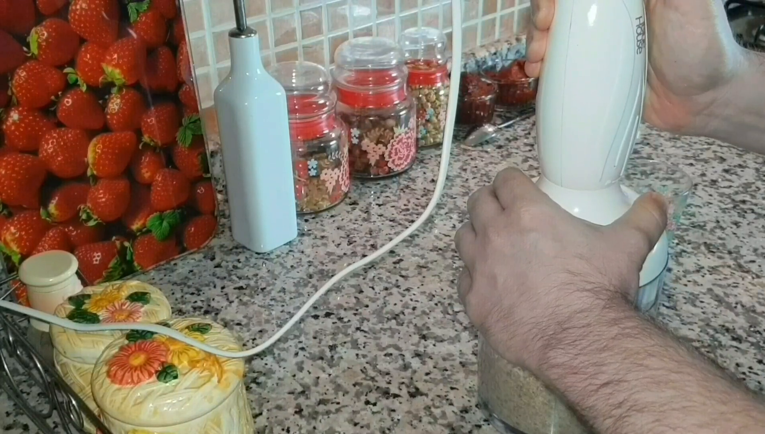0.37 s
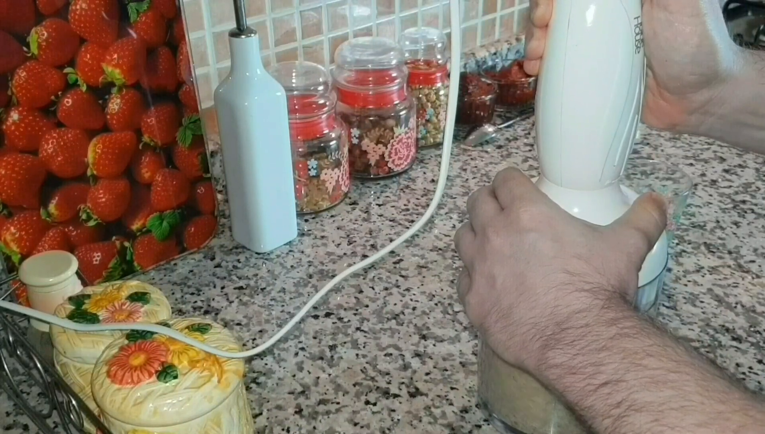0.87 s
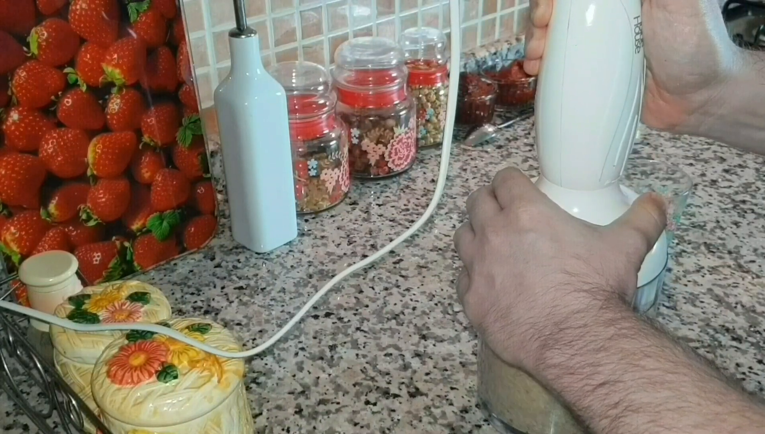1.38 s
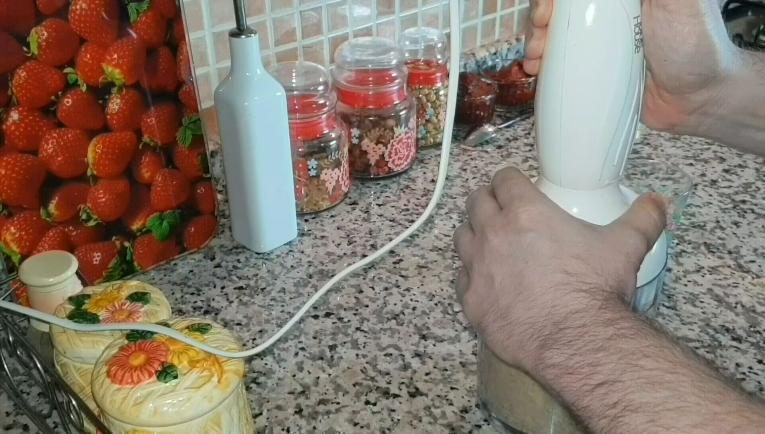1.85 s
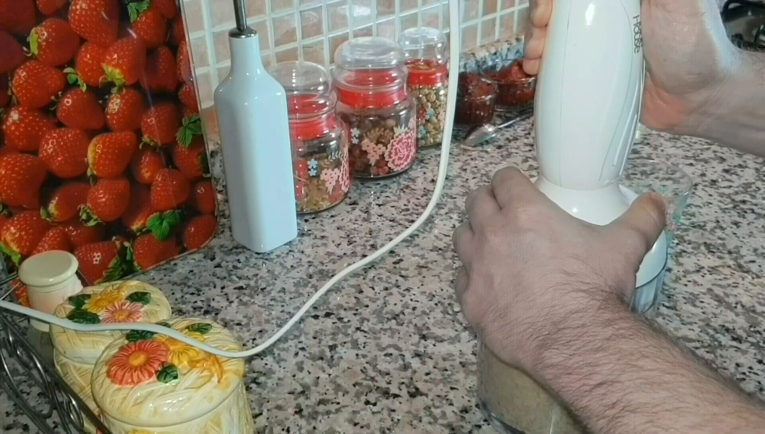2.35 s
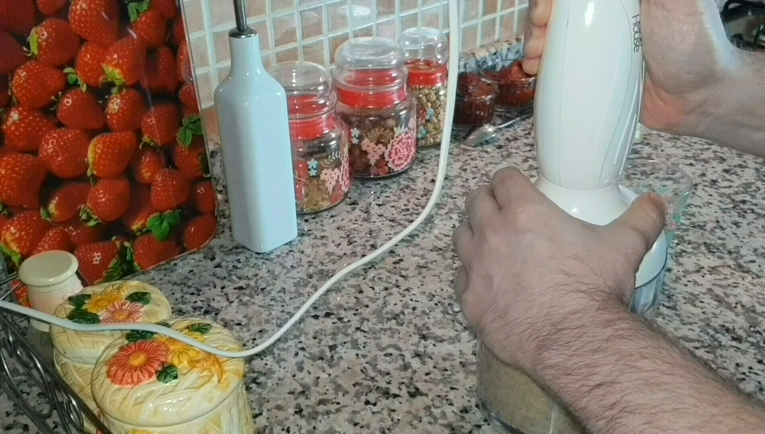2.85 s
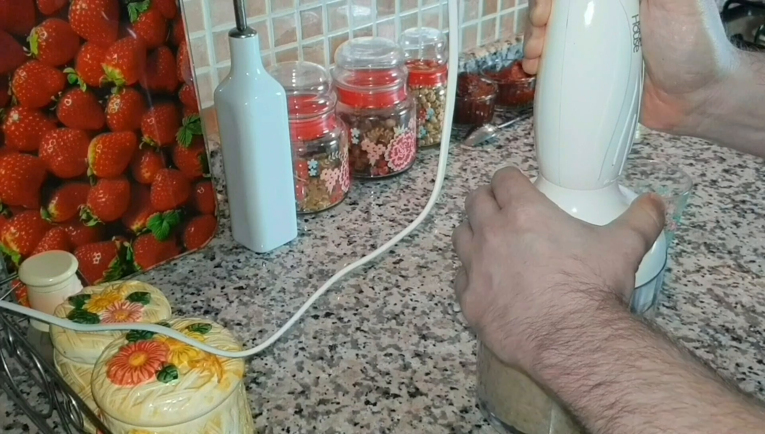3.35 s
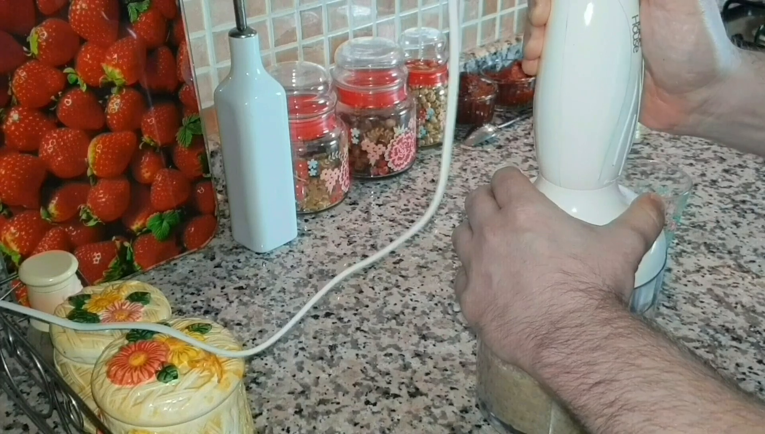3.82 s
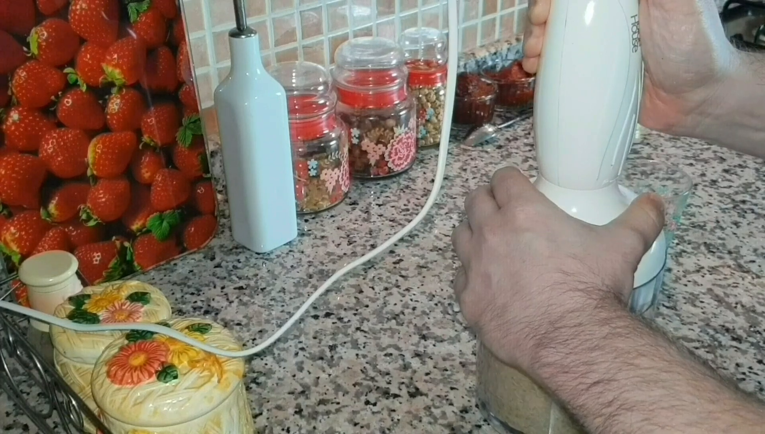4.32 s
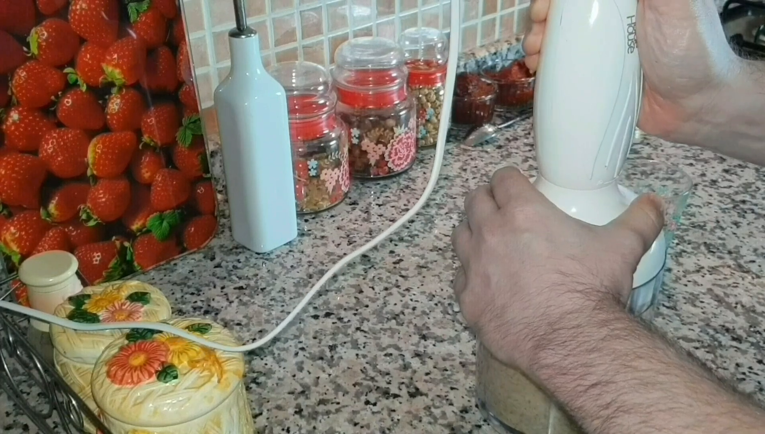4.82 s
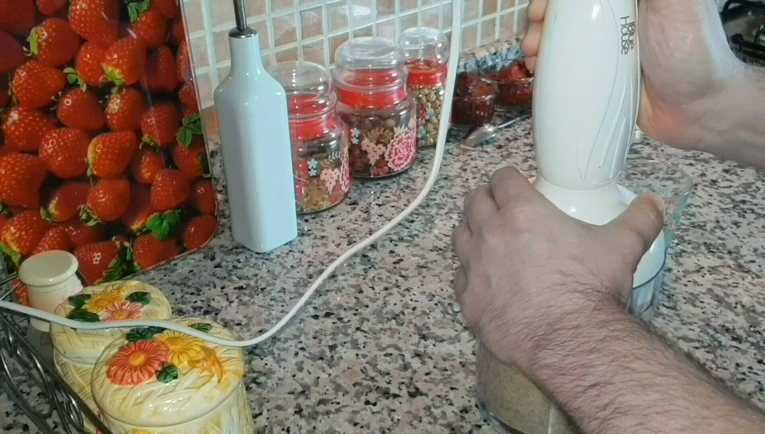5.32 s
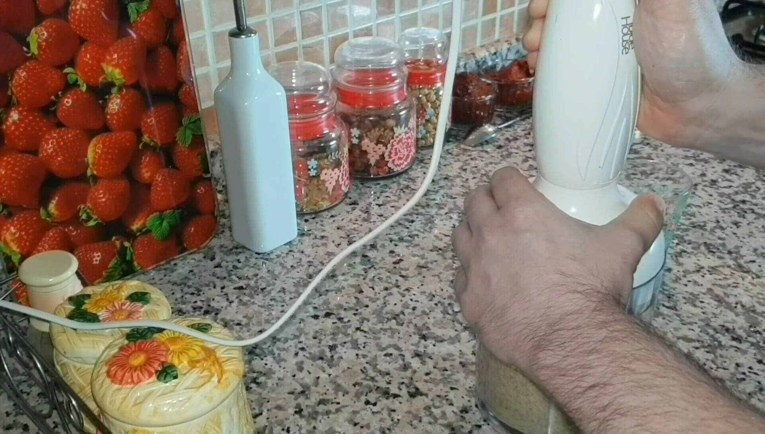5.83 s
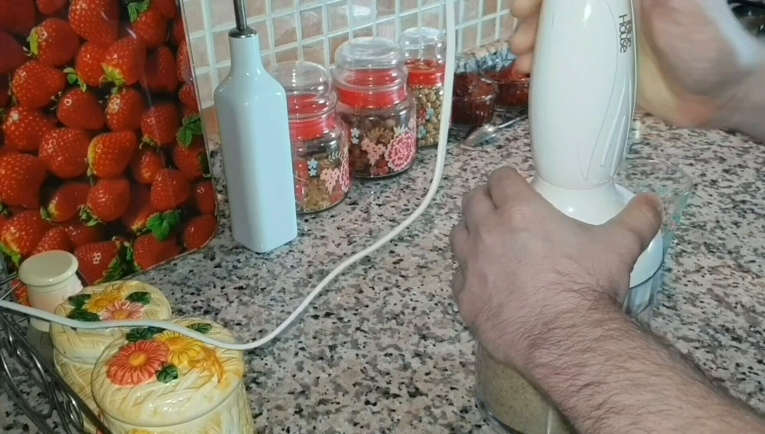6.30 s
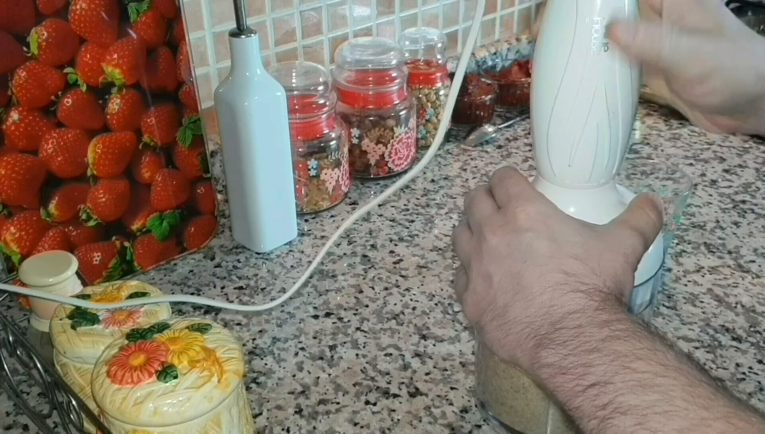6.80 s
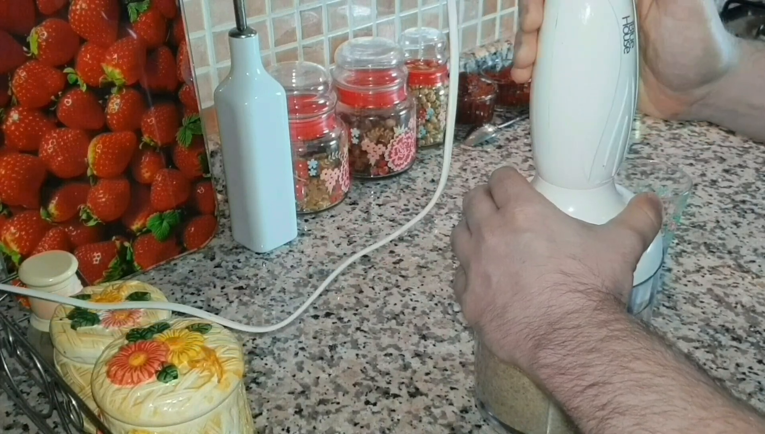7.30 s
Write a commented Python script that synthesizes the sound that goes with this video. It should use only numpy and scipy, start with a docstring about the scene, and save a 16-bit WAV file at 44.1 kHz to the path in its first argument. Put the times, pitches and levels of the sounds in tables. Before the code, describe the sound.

Harsh electric chopper whine with hissing, knocking nuts, stopping and restarting abruptly in a small kitchen, ending with quiet plastic taps and palm rubbing.

```python
"""A hand blender, running from the outset, drives a chopper bowl of nuts on a stone counter in four bursts.
In each the motor's shaft orders whine as sines on one shaft phase, while filtered noise and random impacts
make the nuts hiss, rumble and knock the bowl. Single slams ring bowl modes; decaying sines jolt the body.
Between bursts faint murk and tones fade in the room; lastly a hand taps the handle and its palm rubs it.
A diffuse kitchen field and a steady noise floor lie under everything."""
import sys
import numpy as np
from scipy import signal
from scipy.fft import rfft, irfft, next_fast_len
from scipy.io import wavfile
from scipy.ndimage import map_coordinates

SR = 44100
rng = np.random.default_rng(int(sys.argv[2]) if len(sys.argv) > 2 else 0)


def to_linear_factor(level_db):
    """Convert decibel levels (scalar or array-like) to linear amplitude factors."""
    exponent = np.asarray(level_db, float) / 20
    return 10 ** exponent


def digitize_waveform(pressure):
    """Quantize a signal to 16-bit integers and store it at the path in sys.argv[1].

    Rows of a 2-D input are taken as channels; values are limited to [-1, 1].
    """
    field = np.atleast_2d(pressure).T
    bounded = np.clip(field, -1, 1)
    quanta = np.round(bounded * 32767).astype(np.int16)
    wavfile.write(sys.argv[1], SR, quanta)


N = 338247
T = np.arange(N) / SR  # time in s
GEAR = 4.06  # shaft turns per blade turn

# motor power on and off: on_s, off_s
SWITCH = [(-.5, 0.18), (.648, 3.585), (3.79, 5.2414), (5.597, 6.203)]
# resonances of the bowl: centre_hz, width_hz, gain_db
BOWL = [(2377, 180, 1.5), (2525, 110, 3), (2770, 140, -8.5), (3210, 63, -2.5), (13500, 2100, -24)]


def unit(x):
    """Normalization to unit root-mean-square."""
    return x / np.sqrt(np.mean(x ** 2) + 1e-20)


def along(points, hz):
    """Spectral curve: (hz, value) points interpolated over log frequency."""
    f, v = np.transpose(points)
    return np.interp(np.log(hz + 1), np.log(f + 1), v)


def curves(table):
    """Slow control signals: one value per sample for each column after the time."""
    s, *cols = np.transpose(table)
    return [np.interp(T, s, c) for c in cols]


def wobble(rate):
    """Band-limited modulation: a smooth random curve with `rate` knots a second, at most 390."""
    knots = rng.standard_normal(int(N / SR * 400))
    return map_coordinates(knots, [T * min(rate, 390)])


def filtered(x, response):
    """Linear filtering: the spectrum of x times a complex response of frequency."""
    m = next_fast_len(N + SR // 2)
    return irfft(rfft(x, m) * response(np.fft.rfftfreq(m, 1 / SR)), m)[..., :N]


def modes(table):
    """Modal superposition: second-order resonances of alternating sign, as a response of frequency."""
    def response(f):
        return sum((-1) ** k * to_linear_factor(db) * 1j * f * width / (centre ** 2 - f * f + 1j * f * width)
                   for k, (centre, width, db) in enumerate(table))
    return response


def squared_modes(table):
    """Cascade: the response of the resonances applied twice, which steepens their skirts."""
    return lambda f: modes(table)(f) ** 2


def grit(rate, spread_db):
    """Poisson-like impacts, `rate` a second; levels in dB are exponentially spread and capped."""
    chance, size, sign = rng.random(N), rng.exponential(size=N), rng.standard_normal(N)
    return unit((chance < rate / SR) * to_linear_factor(spread_db * np.minimum(size, 2)) * sign)


def window(start, end, fade):
    """Amplitude gating with linear ramps inside both ends."""
    return np.clip((T - start) / fade, 0, 1) * np.clip((end - T) / fade, 0, 1)


def quiet():
    """Partial coherence: a steady floor and a murky band, shared in part by both sides, and faint tones."""
    # spectrum of the steady background floor, shape only: hz, density_db
    floor_spectrum = [(26, -24), (50, 3), (149, -5), (448, -23), (519, -12), (932, -8), (1520, -14),
                      (3240, -20), (7630, -23), (15500, -21)]
    # murk around 1 kHz, mostly between and after bursts: start_s, end_s, level_db, fall_db_per_s
    murk_spells = [(0.298, 0.662, -63, 39), (5.4, 5.619, -59.5, 49), (6.4, 7.12, -72.5, 3)]
    # faint wavering tones: start_s, end_s, pitch_hz, peak_db
    faint_tones = [(0.356, 0.552, 742, -67.5), (.4, .64, 982, -69.5), (0.39, .64, 1258, -73.5),
                   (5.42, 5.52, 1240, -58), (5.45, 5.6, 1040, -64), (6.68, 6.83, 781, -67.5),
                   (7.487, 7.6, 631, -76)]
    floor_db = -71

    def coherence(f):
        """Bass is shared by both sides, treble is not."""
        blend = np.arctan(f / 600)
        return np.array([np.cos(blend), np.sin(blend)])[[0, 1, 1]]

    floor = filtered(rng.standard_normal((3, N)), lambda f: to_linear_factor(along(floor_spectrum, f)) * coherence(f))
    bed = to_linear_factor(floor_db) * unit(floor[0] + floor[1:])

    band = squared_modes([(800, 320, 0), (1161, 500, -2)])
    murk = unit(filtered(rng.standard_normal((3, N)), band))
    fading = sum(to_linear_factor(db - fall_db * (T - a)) * window(a, b, .03) for a, b, db, fall_db in murk_spells)
    bed = bed + fading * to_linear_factor(2.5 * wobble(28)) * (.83 * murk[0] + .6 * murk[1:])

    tones = np.zeros(N)
    for start, end, hz, db in faint_tones:
        level = to_linear_factor(db + 3 * wobble(30)) * window(start, end, .01)
        tones += level * np.sin(2 * np.pi * hz * np.cumsum(1 + .0061 * wobble(8.9)) / SR)
    return (bed + tones) * to_linear_factor([[-.9], [.9]])  # left a little softer than right


def kitchen(x):
    """Diffuse-field reverberation: power decays exponentially per frequency, incoherent between sides."""
    # reverberation time: hz, t60_s
    decay_times = [(350, .33), (650, 0.46), (2500, 0.16), (6000, 0.092), (14000, 0.074)]
    # gain of the room against its input: hz, gain_db
    wet = [(60, -27), (150, -17), (300, -2.5), (700, -5), (1500, -4.5), (4000, -3.5), (12000, 2.5)]
    hz, t, z = signal.stft(x, SR, nperseg=1024, noverlap=768)
    decay = to_linear_factor(-120 * (t[:96] - t[0]) / along(decay_times, hz)[:, None])  # decay of power
    decay[:, :2] = 0  # first walls arrive late
    decay /= decay.sum(1, keepdims=True)
    power = signal.fftconvolve(np.abs(z) ** 2, decay, axes=1)[:, :len(t)]
    fresh = signal.stft(rng.standard_normal((2, N)), SR, nperseg=1024, noverlap=768)[2]
    fresh = fresh / np.sqrt(np.mean(np.abs(fresh) ** 2))
    field = fresh * np.sqrt(np.abs(power)) * to_linear_factor(along(wet, hz))[:, None]
    return signal.istft(field, SR, nperseg=1024, noverlap=768)[1][:, :N]


def hand():
    """Impact and friction excitation: taps ring the handle and tick; the palm rubs and squeaks."""
    # taps, levels ahead of the resonances: start_s, knock_db, tick_db
    taps = [(6.522, -43.5, -60.5), (6.589, -42, -55.5), (6.669, -45, -41), (6.901, -43.5, -54),
            (6.974, -64.5, -50), (7.008, -56, -50)]
    # slides of the palm: start_s, end_s, level_db, squeak_db against the rub
    rubs = [(6.397, 6.659, -71.5, -20), (6.672, 6.791, -76.5, 6), (6.894, 7.12, -73, -22)]
    # resonances of the handle: centre_hz, width_hz, gain_db
    handle = [(530, 160, -3), (748, 270, 0.5), (935, 100, 5), (1180, 330, 1.5)]
    # resonance of the handle's plastic shell: centre_hz, width_hz, gain_db
    shell = [(4700, 2400, 0)]
    # resonances of the rub: centre_hz, width_hz, gain_db
    palm = [(4000, 2500, -1.5), (6820, 2000, -5.5)]
    # resonances of the squeak: centre_hz, width_hz, gain_db
    squeak_modes = [(1970, 145, 1), (2200, 120, 3), (4930, 400, -1)]
    scrape_t60_s, tick_t60_s = .085, .025
    blow_db = 16  # first blow over the scrape that follows

    knock, tick = np.zeros((2, N))
    t = np.arange(SR // 8) / SR
    for s, knock_db, tick_db in taps:
        at = round(s * SR)
        blow_and_scrape = rng.standard_normal(len(t)) + to_linear_factor(blow_db) * (t == 0)
        knock[at:at + len(t)] += to_linear_factor(knock_db - 60 * t / scrape_t60_s) * blow_and_scrape
        tick[at:at + len(t)] += to_linear_factor(tick_db - 60 * t / tick_t60_s) * rng.standard_normal(len(t))

    skin = unit(filtered(grit(1500, spread_db=4.5) * to_linear_factor(4 * wobble(40)), modes(palm)))
    squeak = unit(filtered(rng.standard_normal(N), squared_modes(squeak_modes)))
    sliding = np.zeros(N)
    for start, end, db, squeak_db in rubs:
        level = to_linear_factor(db - 27 * (T - start)) * window(start, end, .0078)
        sliding += level * (skin + to_linear_factor(squeak_db) * squeak)
    return filtered(knock, squared_modes(handle)) + filtered(tick, squared_modes(shell)) + sliding


def jolts():
    """Damped oscillation: the body shudders on the counter at starts, stops and when gripped."""
    # shudders, level ahead of the onset ramp and a factor of 3: start_s, pitch_hz, level_db, t60_s
    shudders = [(0.219, 62.1, -56, 0.34), (.67, 309, -36.5, 0.26), (3.6, 179.3, -50, 0.61),
                (3.838, 299.5, -31.5, 0.14), (6.17, 156, -47, 0.4), (6.247, 120, -44, 0.25),
                (6.335, 75, -58.5, 0.43), (6.904, 91.2, -62, 0.34)]
    out, t = np.zeros(N), np.arange(SR // 4) / SR
    for s, hz, db, t60 in shudders:
        cycles = hz * np.cumsum(1 + .1 * wobble(70)[:len(t)]) / SR
        envelope = to_linear_factor(db - 60 * t / t60) * (1 - np.exp(-t / .0057))
        out[round(s * SR):][:len(t)] += envelope * 3 * np.sin(2 * np.pi * cycles)
    return out


def slams():
    """Impulse response: big pieces slam into the wall and ring the bowl's two strongest resonances."""
    # blows on the bowl wall: start_s, peak_db
    wall_blows = [(.175, -12), (.215, -15), (.674, -8), (.703, -8), (.722, -8), (.912, -9), (1.259, -9),
                  (1.962, -8), (1.984, -7), (5.253, -14), (5.635, -13)]
    ring = filtered(T == 0, squared_modes(BOWL[:2]))[:SR // 10]
    s, db = np.transpose(wall_blows)
    blows = np.bincount(np.round(s * SR).astype(int), to_linear_factor(db), N)
    return signal.fftconvolve(blows, ring / np.abs(ring).max())[:N]


def swell():
    """Amplitude envelope of the stirring: builds in the first turns, dies once the blade has slowed."""
    up, down = [], []
    for on, off in SWITCH:
        since_on = T - on
        rise = np.clip(since_on / .009, 0, 1) * to_linear_factor(-19 * np.clip(1 - since_on / .034, 0, 1))
        up.append(np.where(since_on > 0, rise, 0))
        down.append(to_linear_factor(-230 * np.clip(T - off - .05, 0, None)))
    return np.max(np.multiply(up, down), axis=0)


def spool():
    """Exponential relaxation of rotation: share of full speed in a quick run-up and a braked coast-down."""
    up = [np.where(T > on, 1 - .55 * np.exp(-np.abs(T - on) / .03), 0) for on, off in SWITCH]
    down = [np.exp(-np.clip(T - off, 0, None) / .07) for on, off in SWITCH]
    return np.max(np.multiply(up, down), axis=0)


def ringing_spells():
    """Narrow-band resonance of noise: a low growl and a bright band, each ringing for a while."""
    # bands: centre_hz, width_hz, start_s, end_s, level_db against the load's level
    spells = [(452, 200, 2.42, 3.17, -14), (4920, 120, 1.85, 2.8, -12)]
    out = np.zeros(N)
    for hz, width, start, end, db in spells:
        band = unit(filtered(rng.standard_normal(N), squared_modes([(hz, width, 0)])))
        out += to_linear_factor(db) * window(start, end, .05) * band
    return out


def nuts(angle):
    """Granular excitation: fine pieces hiss in time with shaft, blade and mains; coarse ones rumble and knock."""
    # load in the bowl: start_s, level_db, coarseness (about 0-1)
    load = [(0, -23, 0.97), (.1, -25.5, 1.05), (.25, -34.5, .95), (.66, -23.5, 0.92), (.8, -23, 0.9),
            (2.4, -23, 0.89), (2.47, -24, 0.8), (3.12, -25.5, 0.8), (3.25, -25, 0.7), (3.55, -25, 0.7),
            (3.8, -20, 0.58), (3.96, -23, .5), (4, -24.5, 0.5), (4.8, -24, 0.59), (5.2, -24.5, 0.05),
            (5.7, -22, 0.05), (5.95, -25, 0.5), (6.15, -23.5, 0.29)]
    # spectrum of the fine spray, shape only: hz, density_db
    hiss_spectrum = [(290, -58), (500, -32), (1030, -12.5), (1210, -11.5), (1440, -9), (2090, -16),
                     (2830, -5), (3730, -7), (4180, -8.5), (4760, -11.5), (7140, -16), (15800, -29.5)]
    # spectrum of the tumbling pieces, shape only: hz, density_db
    rumble_spectrum = [(24, -73.5), (40, -32.5), (177, -15.5), (467, -15), (511, -7.5), (622, -13.5),
                       (682, -6), (1010, -4.5), (1190, -10), (1500, -15), (1950, -51.5), (3300, -120)]
    # resonances of the motor housing: centre_hz, width_hz, gain_db
    housing = [(4135, 190, 9.5), (6090, 220, -3.5), (7170, 210, -5), (9140, 170, -6)]
    # the housing rings up: centre_s, half_length_s, lift_db
    ring_surges = [(3.1, .3, 4.5), (6.001, .35, 6.5)]
    # Levels against the load's level: fine_meal_db, more_when_coarse_db, more_while_flung_db,
    # share of the last while the nuts fall back
    rumble_law = (-22, 16, 11.5, 1.06)
    knock_law = (-14, 18, 6, 0.74)  # same columns
    ring_law = (-2, 0, -5.5, 1.5)  # same columns
    fling_s, fall_s, fall_db = .09, .064, -5  # settling after a start; slump after a stop and its loss
    fines_drop_db_per_s = 11.5  # after a stop the fine spray and the ring die before the pieces do
    sweep_db = 4  # knocks bunch up once per blade turn

    load_db, coarse = curves(load)
    flung = sum((T > on) * np.exp(-np.abs(T - on) / fling_s) for on, off in SWITCH)
    falling, since_stop = np.zeros((2, N))
    next_starts = [on for on, off in SWITCH[1:]] + [N / SR]
    for (on, off), back in zip(SWITCH, next_starts):
        falling += (T < back) * np.clip((T - off) / fall_s, 0, 1)
        since_stop += (T < back) * np.clip(T - off, 0, None)
    fines_db = -fines_drop_db_per_s * since_stop
    surge_db = sum(db * np.clip(1 - np.abs(T - s) / half, 0, 1) for s, half, db in ring_surges)

    def gain(fine_db, coarse_db, stir_db, fall_share):
        return to_linear_factor(fine_db + coarse_db * coarse + stir_db * (flung + fall_share * falling))

    # shaft, blade and mains torque modulate the noise
    beat = 1 + .2 * np.sin(angle) + .15 * np.sin(angle / GEAR) + .15 * np.sin(2 * np.pi * 100 * T)
    lumps_db = .56 * wobble(35)

    spray = rng.standard_normal(N) + .5 * grit(3000, spread_db=3.0)
    spray = beat * to_linear_factor(lumps_db + 1.9 * wobble(120)) * spray
    hiss = unit(filtered(spray, lambda f: to_linear_factor(along(hiss_spectrum, f))))

    shaking = beat * to_linear_factor(lumps_db + 1.3 * wobble(70)) * rng.standard_normal(N)
    ring = unit(filtered(shaking, modes(housing)))

    tumble = beat * to_linear_factor(lumps_db + .5 * wobble(60)) * rng.standard_normal(N)
    rumble = unit(filtered(tumble, lambda f: to_linear_factor(along(rumble_spectrum, f))))

    bunching_db = 2.8 * wobble(80) + sweep_db * np.sin(angle / GEAR + 1.2 * wobble(14))
    impacts = grit(1200, spread_db=4.0) + .6 * rng.standard_normal(N)
    knocks = unit(filtered(impacts * to_linear_factor(bunching_db), modes(BOWL)))

    mix = to_linear_factor(3 + fines_db) * hiss + gain(*rumble_law) * rumble + gain(*knock_law) * knocks
    mix = mix + gain(*ring_law) * to_linear_factor(surge_db + fines_db) * ring + ringing_spells()
    return swell() * to_linear_factor(load_db + fall_db * falling) * mix


def blade_hum(angle):
    """Harmonics of the geared-down rotation: orders of the blade that hum for a while."""
    # lines, level before the whine's final lift: blade_order, start_s, end_s, level_db
    blade_lines = [(5, 2.5, 4.65, -56), (9, 1.2, 3.2, -48), (10, 2.42, 3.17, -46.5),
                   (13, 2.42, 3.25, -46.5)]
    hum = np.zeros(N)
    for order, start, end, db in blade_lines:
        level = np.sqrt(2) * to_linear_factor(db + 1.6 * wobble(14)) * window(start, end, .1)
        hum += level * np.sin(order * angle / GEAR + .4 * wobble(15))
    return hum


def motor():
    """Order synthesis: sines locked to shaft phase, with side lines; returns the whine and the shaft angle."""
    # shaft under power: start_s, speed_hz, strain_db of the drive
    shaft_speed = [(0.01, 173.1, -9.5), (.85, 173.9, -5), (1.8, 171.7, -3), (2.39, 169.6, -4),
                   (2.45, 170.3, -3.5), (2.75, 171.2, -4), (3.02, 168.8, -5), (3.1, 168.1, -1),
                   (3.6, 167.2, 0), (3.85, 171.1, -0.5), (4.1, 169.4, -4), (4.33, 168.2, 2),
                   (4.46, 166.1, -3), (4.73, 162.5, 5.5), (5.13, 161.6, 2.5), (5.18, 163.4, -8),
                   (5.25, 164.3, 4.5), (5.65, 164.8, -0.5), (5.88, 162.5, 5), (6.02, 159.3, 4),
                   (6.12, 158.7, 4), (6.15, 160.3, -5), (6.22, 164.3, 4.5)]
    # how loosely the drive shakes: start_s, looseness (0-1)
    looseness = [(0, 0.66), (.8, 0.88), (2.39, 1), (2.75, 0.75), (3.02, 0.55), (3.15, .1), (3.85, .35),
                 (4.3, 0.38), (4.6, 0.92), (4.95, 0.35), (5.6, 0.34), (6.2, 0.24)]
    # main lines, levels before the final lift: order, level_db, more_before_seating_db,
    # more_when_loose_db, share of the strain
    main_orders = [(3, -60, 11, 16, 0), (5, -51.5, 4, 12, 0.27), (7, -41, -17.5, 8, 0.83),
                   (9, -30, -3.5, 1, 0.99)]
    # weaker lines; 100 Hz is the mains torque ripple: order, offset_hz, order that it follows,
    # level_db against that
    low_orders = [(1, 0.5, 3, -19.5), (6, 0.5, 3, -3), (2, 99.5, 3, -9), (4, 99.5, 3, -4),
                  (5, 99.5, 3, -10.5), (2, 0, 5, -14.5), (4, -1, 5, -6.5), (10, -1, 5, -14.5)]
    # the seventh order stands out after seating: start_s, end_s, lift_db
    seventh_sings = (2.42, 2.88, 4.5)
    # the low orders give way to the high ones, as if the drive settles in its seat
    seats_s, seating_s = 2.41, .045

    hz, strain_db = curves(shaft_speed)
    loose = np.clip(curves(looseness)[0], 0, 1)
    unseated = np.clip((seats_s - T) / seating_s + .5, 0, 1)
    level_db = {}
    for order, db, early_db, loose_db, share in main_orders:
        level_db[order] = db + early_db * unseated + loose_db * loose + share * strain_db
    start, end, lift_db = seventh_sings
    level_db[7] = level_db[7] + lift_db * window(start, end, .03)

    speed = spool()
    slack = 1 - speed  # off full speed the gears chatter: pitch and level shake
    chatter = .38 * slack * wobble(150)
    angle = 2 * np.pi * np.cumsum(hz * speed * (1 + .0011 * wobble(30) + chatter)) / SR
    stumble_db = slack * (15 * wobble(90) - 17)

    whine = np.zeros(N)
    main_lines = [(order, 0, order, 0) for order in level_db]
    for order, above_hz, leader, db in main_lines + list(low_orders):
        phase = order * angle + 2 * np.pi * above_hz * T + rng.uniform(0, 2 * np.pi)
        shake_db = (.7 + 2.6 * unseated) * wobble(25) + stumble_db
        whine += np.sqrt(2) * to_linear_factor(level_db[leader] + db + shake_db) * np.sin(phase)
    whine += blade_hum(angle)
    loaded = np.clip((speed - .42) / .2, 0, 1)  # the whine is silent below 42 % of full speed
    return to_linear_factor(3.5) * whine * loaded * swell(), angle  # final lift of 3.5 dB


def scene():
    """Interaural-style phase and level differences: direct sound at two ports; the room fills in."""
    # lead of the left port over the right: hz, phase_rad
    lead = [(0, -0.1), (350, .5), (950, 0.58), (1550, 1.47), (2400, -2), (3270, -2.5), (4130, -2),
            (5200, -4), (6720, -4.5), (9040, -5), (15000, -23)]
    # level of the left port over the right: hz, difference_db
    tilt = [(100, -1), (300, 1), (600, -5), (1500, -1), (4000, -4.5), (10000, -3)]
    whine, angle = motor()
    rough = nuts(angle) + slams() + jolts() + hand()
    side = np.array([[.5], [-.5]])  # each port takes half of the difference

    def ports(f):
        return to_linear_factor(side * along(tilt, f)) * np.exp(1j * side * np.interp(f, *np.transpose(lead)))

    direct = filtered(whine + rough, ports)
    room = kitchen(rough + to_linear_factor(-9) * whine)  # steady tones blur far less in the room than noise does
    return direct + room + quiet()


def low_pass(x):
    """Removes everything above the highest recorded frequency."""
    return signal.sosfilt(signal.butter(12, 16900, fs=SR, output="sos"), x)


def record(dry):
    """Soft saturation and band limitation: peaks round off in the input stage, then treble is cut."""
    rounded = dry / (1 + np.abs(dry / .95) ** 6) ** (1 / 6)
    finished = filtered(rounded, lambda hz: hz < 15850)
    return low_pass(finished)


dry = scene()
out = record(dry)
digitize_waveform(out)
```